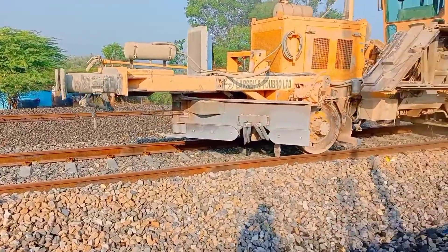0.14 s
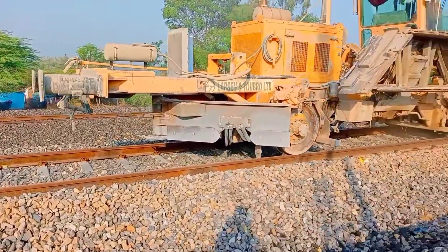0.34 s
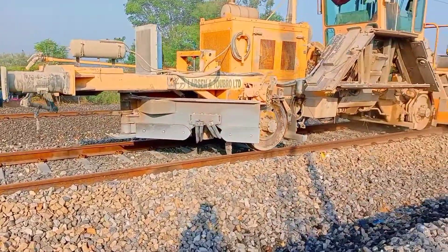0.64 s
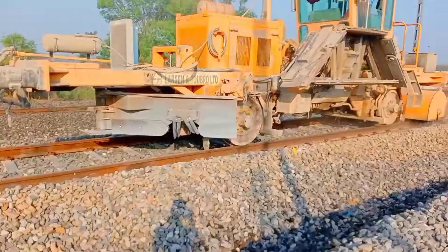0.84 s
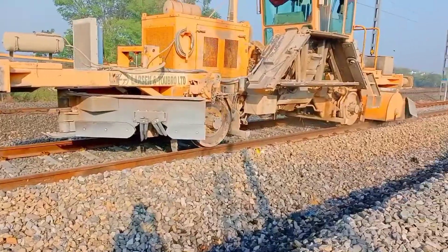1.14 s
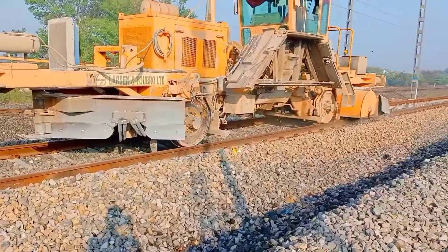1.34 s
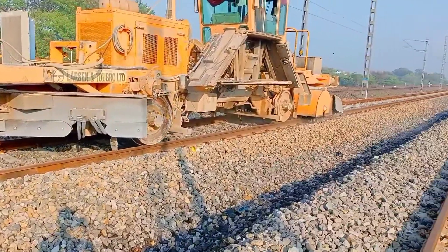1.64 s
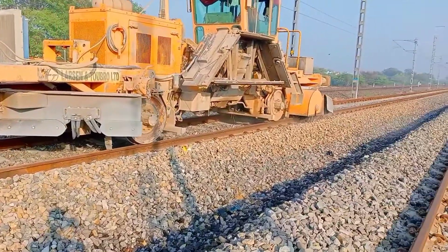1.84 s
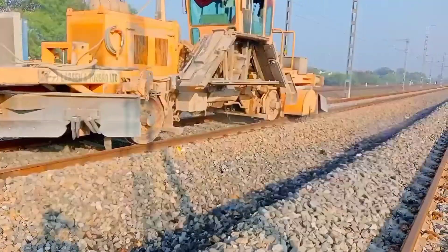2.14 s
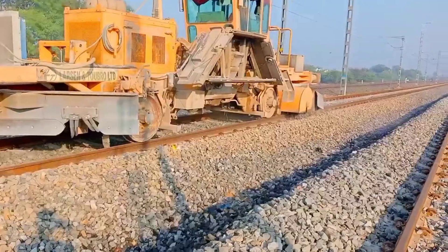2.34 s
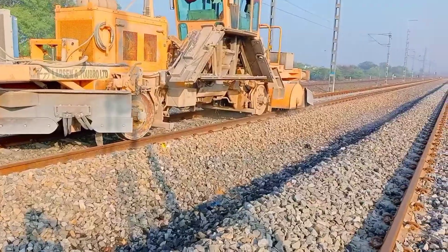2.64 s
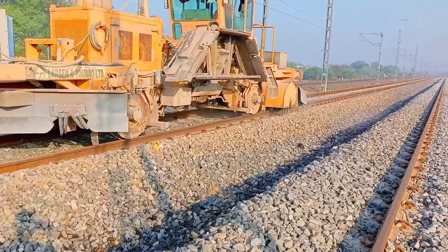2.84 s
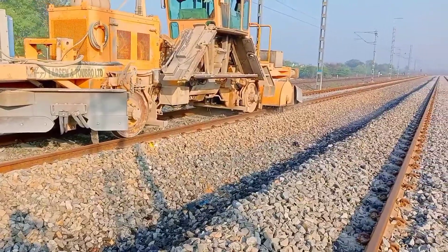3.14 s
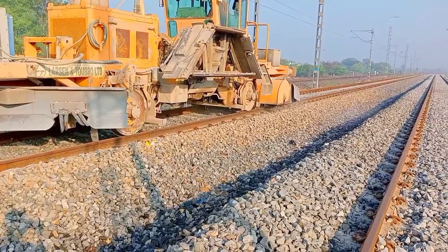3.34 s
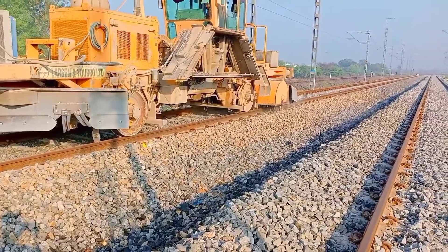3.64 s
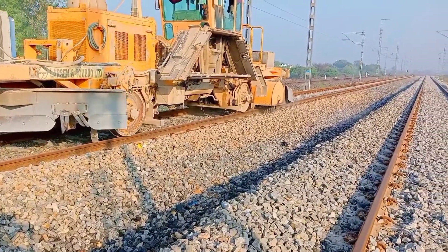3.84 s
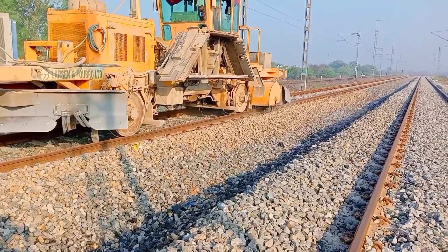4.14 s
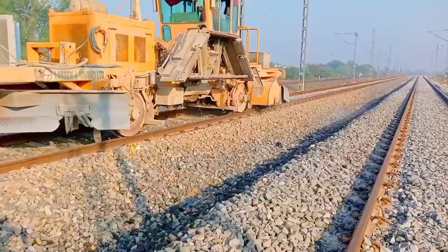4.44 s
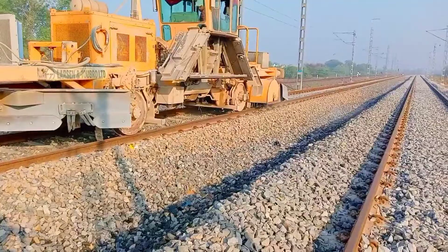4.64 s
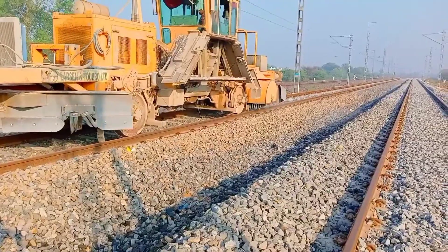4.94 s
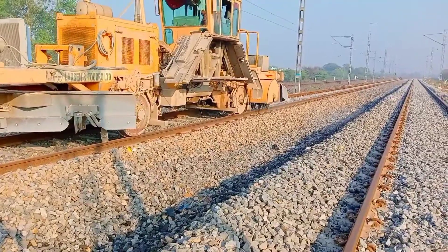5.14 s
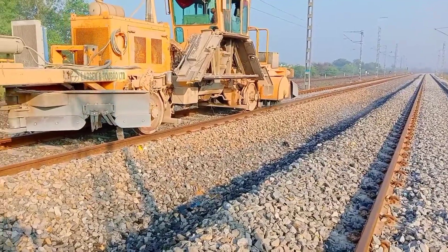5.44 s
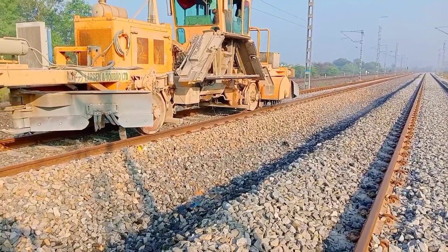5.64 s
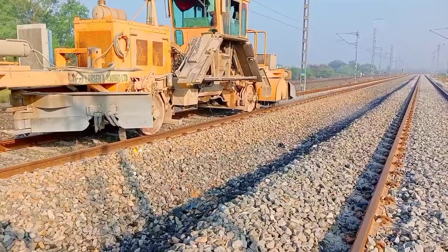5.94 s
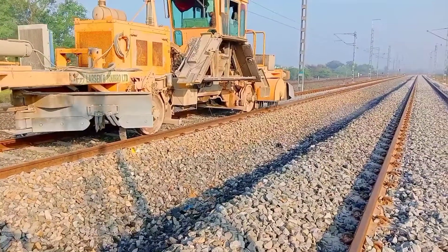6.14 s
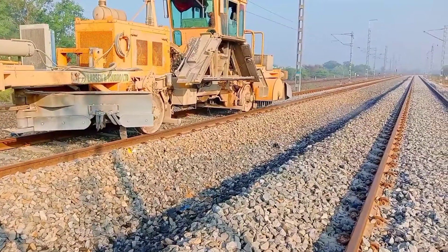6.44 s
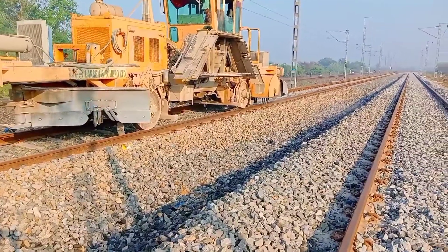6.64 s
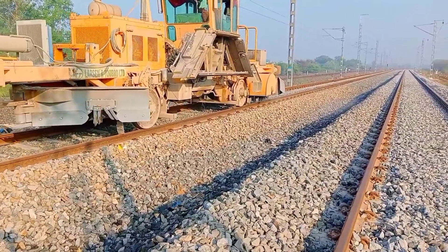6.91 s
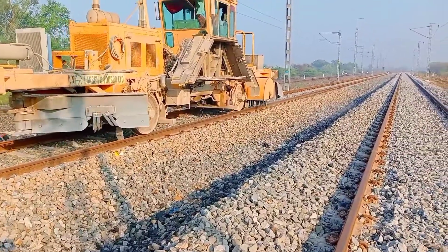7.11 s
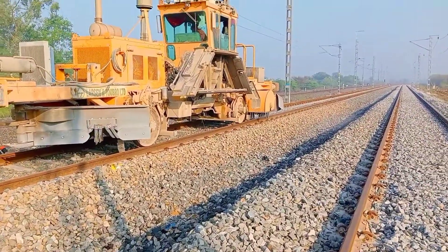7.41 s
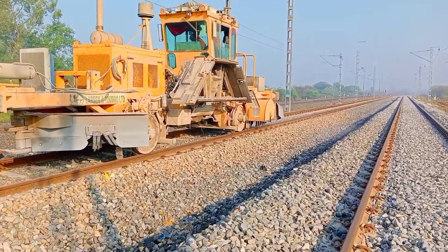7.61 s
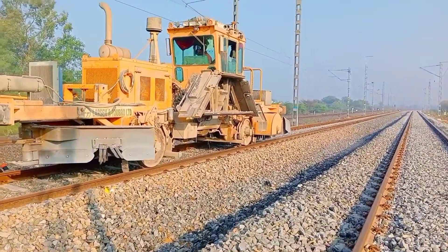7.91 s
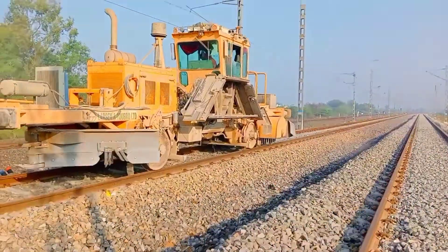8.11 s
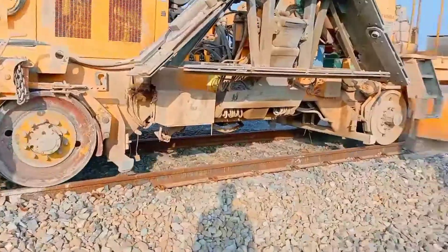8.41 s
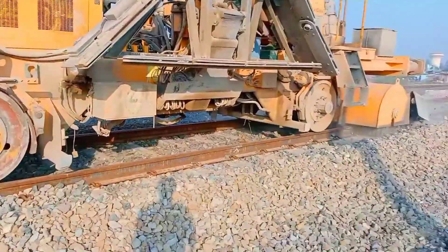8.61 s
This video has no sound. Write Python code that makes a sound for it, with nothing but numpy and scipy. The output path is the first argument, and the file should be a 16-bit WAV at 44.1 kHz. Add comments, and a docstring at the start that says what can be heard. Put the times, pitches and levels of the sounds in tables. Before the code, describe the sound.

Beside an open railway line, a heavy track maintenance machine rolls slowly away. From 0 s its diesel holds a steady, slightly wavering low hum around 200 Hz, under a broad rush of cooling air and a faint thin whine. Loose steel is busiest from 0 to 2.9 s: irregular, closely spaced clanks, several per second, with short bright ringing, dull thuds and tiny gritty rattles. Sharp ticks stand out near 1.2, 1.5, 2.2 and 2.6 s. Clatter then falls away, leaving hum and rush, with one small cluster of clinks and a tick around 3.8 to 4.2 s. The rush gradually softens and darkens. Around 5.7 s the engine pitch dips slightly, recovering by 6.2 s, then runs evenly. At 8.2 s the sound cuts abruptly, leaving a barely audible brief tail. Phone microphone, close outdoor perspective, slight short reflection from the ballast.

```python
"""Beside a railway line, a track maintenance machine rolls slowly away, its six-cylinder diesel at working speed.
Sines locked to the engine cycle make exhaust, fan and pump; a thin whine keeps its own pitch. Shaped noise makes
the rush of cooling air. Loose steel clanks, ticks and rattles, most while the machine is near, as short pushes
ringing steel modes and as tiny grains. All but the tones arrive twice, direct and off the ballast.
The sound stops abruptly, leaving a faint tail."""
import sys
import numpy as np
from scipy import signal
from scipy.fft import rfft, irfft, next_fast_len
from scipy.io import wavfile
from scipy.ndimage import uniform_filter1d

SR = 44100
rng = np.random.default_rng(int(sys.argv[2]) if len(sys.argv) > 2 else 0)


def transcribe(u):
    """Save the signal u as a 16-bit wav file named by the first command-line argument.

    u: samples, shape (n,) or (channels, n), limited to [-1, 1]; the rate is SR.
    q: integer samples, one column per channel.
    """
    v = np.clip(np.atleast_2d(u).T, -1, 1)
    q = np.round(v * 32767).astype(np.int16)
    wavfile.write(sys.argv[1], SR, q)


N = 386737
T = np.arange(N) / SR
MIDWAY_S = 4  # the slow drifts of pump, exhaust and rush peaks pass through zero here

# Governed engine speed with one brief sag under load. Each row: time in seconds, second firing harmonic in Hz,
# level of the hum in dB before HUM_TRIM_DB.
ENGINE_SPEED = [(0, 201.6, -21.5), (1, 202.3, -22), (2.5, 201, -25), (2.9, 201.8, -24), (4.3, 201.8, -24.5),
                (4.8, 201.1, -22.5), (5.5, 201.3, -25), (5.72, 198.3, -24.5), (5.9, 198.4, -23.5),
                (6.15, 202.6, -22.5), (7, 201.6, -24.5), (8.2, 201.5, -22)]
# Exhaust tones. Each row: multiple of the four-stroke cycle, level in dB on top of the hum level.
EXHAUST_ORDERS = [(4, -47.5), (5, -38), (6, -14), (7, -28), (8, -37.5), (9, -33), (10, -20), (11, -23),
                  (12, 0.5), (13, -8.5), (14, -17.5), (15, -19.5), (16, -13.5), (18, -14.5), (20, -33.5),
                  (24, -19.5), (25, -25.5), (28, -29), (29, -34.5), (32, -43.5), (34, -24), (36, -22.5),
                  (39, -21), (42, -19.5), (46, -34.5), (48, -18), (52, -20.5), (54, -28)]
HUM_TRIM_DB, UPPER_FIRING_RISE_DB_PER_S = -1.77, 1.2  # the exhaust turns towards the phone
# Cooling fan: blade tone against the untrimmed hum at the start, sinking as the machine draws away.
FAN_ORDER, FAN_OCTAVE_DB, FAN_DB, FAN_FALL_DB_PER_S = 13.21, -16, -4, 0.7
# Belt pump. Each row: multiple of the cycle, level in dB midway, wavering in dB.
PUMP_WHINES = [(22.16, -43.5, 3)]
PUMP_FALL_DB_PER_S = 0.85  # the pump turns away
# Thin whine that keeps its pitch. Each row: time in seconds, level in dB.
STEADY_WHINE = [(0, -38), (1.7, -47), (2.6, -37), (3.4, -35.5), (4.2, -42.5), (5.6, -45.5), (6.3, -39.5),
                (7.2, -39.5), (8.2, -44.5)]
STEADY_HZ = 1682

# Colour of the rush, relative within each of its four ranges. Each row: frequency in Hz, density in dB per Hz.
RUSH_COLOUR = [(18, -73.5), (30, -52.5), (86, -23.5), (145, -20), (210, -12), (330, -10), (520, -20),
               (620, -12.5), (900, -12), (1010, -26.5), (1190, -18.5), (2230, -24.5), (3770, -23),
               (4600, -26.5), (5300, -30.5), (7600, -43), (9400, -43.5), (10600, -65.5), (12500, -54.5),
               (16000, -49)]
# Rush in four ranges: low, middle, treble and top. Each row: level far off in dB, extra level while near in dB,
# fading time in seconds. The middle is trimmed once more in rush().
RUSH_LEVELS = [(-29, 5, 1.8), (-27.5, 5, 4.45), (-46, 3, 4.5), (-56.5, 12, 1.3)]
# Narrow bands of noise laid over the rush, sinking slowly in pitch as the machine draws away. Each row:
# centre midway in Hz, width in Hz, level in dB added to the middle row of RUSH_LEVELS.
RUSH_PEAKS = [(2503, 27, -17), (3099, 71, -10), (3650, 220, -13)]
PEAK_SAG_PER_S = 0.006  # share of the midway pitch lost each second

RATTLE_COUNT, RATTLE_FADE_S = 400, 1.5
RATTLE_DB, RATTLE_SPREAD_DB = -34.5, 2.5  # grain setting, and mean random lift above it

# Blows on loose steel, levels before the trims in clanks(). Each row: start in seconds, plates in dB,
# thud in dB, lower ring in Hz, lower ring in dB, upper ring in dB, small parts in dB.
CLANKS = [(0.009, -41, -24.5, 2666, -55, -40, -35), (0.096, -26, -36, 2655, -33, -43, -35),
          (0.176, -22, -42, 2580, -30, -39, -29), (0.236, -42, -35, 2720, -36, -31, -49),
          (0.39, -40, -32, 2550, -45, -54, -38), (0.44, -29, -43, 2610, -36, -32, -38),
          (0.503, -36, -42, 2750, -55, -38, -55), (0.572, -23, -23.5, 2730, -26, -35, -35),
          (0.605, -21.5, -16, 2260, -29, -40, -35), (0.657, -28, -28, 2530, -39, -27, -39),
          (0.778, -24, -29, 2580, -49, -39, -34), (0.801, -29, -35, 2386, -38, -45, -53),
          (0.867, -23, -27, 2310, -36, -32, -33), (0.895, -25, -33, 2530, -48, -35, -36),
          (0.977, -21.5, -30, 2650, -30, -41, -37.5), (1.023, -30, -33, 2503, -43, -52, -44),
          (1.108, -20.5, -38, 2590, -23, -22, -41), (1.163, -18, -39, 2675, -20, -30, -36),
          (1.227, -38, -43, 2530, -40, -24, -48), (1.264, -24.5, -37, 2680, -32, -26, -36),
          (1.346, -26, -36, 2600, -23.5, -32, -41), (1.43, -26, -30, 2105, -33, -48, -55),
          (1.526, -19.5, -28, 2620, -20, -28, -38), (1.546, -33, -48, 2600, -27, -36, -58),
          (1.748, -27.5, -52, 2590, -41, -35, -44), (1.807, -31, -43, 2054, -31, -47, -43),
          (1.905, -24.5, -31, 2650, -43, -37, -57), (2.079, -25.5, -38, 2600, -36, -44, -46),
          (2.184, -17.5, -16, 2790, -33, -26, -49), (2.287, -38, -31, 2480, -28, -36, -58),
          (2.347, -35, -47, 2460, -55, -46, -57), (2.459, -37, -30, 2025, -55, -39, -48),
          (2.597, -14.5, -42, 2480, -32, -27.5, -29), (2.69, -25.5, -50, 2590, -42, -47, -43),
          (2.774, -22.5, -27, 2580, -41, -49, -38), (2.82, -26, -27, 2490, -39, -28, -41),
          (2.867, -38, -32, 2500, -40, -49, -54), (3.83, -36, -40, 2510, -51, -55, -41.5),
          (3.968, -26.5, -36, 2620, -43, -34, -32.5), (4.122, -27, -47, 2570, -49, -34, -46)]
# Damped modes of the plates. Each row: frequency in Hz, 60 dB decay in seconds, level in dB before the mix.
PLATE_MODES = [(1352, 0.04, -8.5), (1567, 0.011, 4), (2147, 0.013, 2.5), (2800, 0.0043, 4.5),
               (3250, 0.0071, 1.5), (3810, 0.0085, 4), (4234, .015, -0.5), (5430, .008, -27)]
# Damped modes of the small parts. Each row: frequency in Hz, 60 dB decay in seconds, level in dB before the mix.
SMALL_PART_MODES = [(7570, 0.0081, -6.5), (8400, .01, -1), (8900, 0.015, -5)]
CLANK_RISE_S, CLANK_LENGTH_S = 0.0039, 0.012
THUD, THIN_RING = (635, 0.11), (8620, 0.08)  # Hz, 60 dB decay in s
LOW_RING_T60_S, HIGH_RING_HZ, HIGH_RING_T60_S = 0.071, 3206, 0.15
EDGE_DB, PLATE_CRACK_DB = -22, -17  # against the plates' push
THIN_RING_DB, CRACK_DB, CRACK_FALL_DB_PER_S = -5, -6, 3  # against the small parts' push

# Hard first contacts. Each row: start in seconds, level in dB that the ring decays from.
TICKS = [(1.1718, -11.5), (1.53, -2.5), (2.1886, -3), (2.6108, -12), (3.9705, -8)]
TICK_HZ, TICK_DECAY_S = 3400, 0.00094

# Ballast echo. Each row: time in seconds, delay in milliseconds, strength as a gain.
BALLAST_ECHO = [(0, 1.495, 0.26), (3, 1.521, 0.2), (8.2, 1.505, 0.27)]
MIC_HZ, MIC_WIDTH_HZ, MIC_GAIN = 8880, 560, 1.38  # port resonance of the phone, added to the plain sound
STOP_S, STOP_FADE_S, STOP_TAIL_DB, STOP_T60_S = 8.2, 0.0036, -50, 0.17
TOP_HZ = 15480


def undb(db):
    """Decibels to gain."""
    return 10 ** (np.asarray(db) / 20)


def level(x, db):
    """Scale to an rms level."""
    return x * undb(db) / np.sqrt(np.mean(x ** 2))


def curves(table):
    """Columns of a table joined by straight lines in time."""
    s, *columns = np.transpose(table)
    return [np.interp(T, s, c) for c in columns]


def walk(rate):
    """Random levels held 1 / rate seconds and slewed twice; spread near 1."""
    k = int(SR / rate)
    steps = np.repeat(rng.standard_normal(N // k + 1), k)
    return 1.59 * uniform_filter1d(uniform_filter1d(steps, k), k)[:N]


def band(x, lo_hz, hi_hz):
    """Gentle band-pass."""
    return signal.sosfilt(signal.butter(2, [lo_hz, hi_hz], "band", fs=SR, output="sos"), x)


def engine():
    """Exhaust orders of the cycle waver a little; fan and pump turn with the crank; one whine stands apart."""
    hz, hum_db = curves(ENGINE_SPEED)
    cycle = 2 * np.pi * np.cumsum(hz / 12) / SR  # the second firing harmonic is the 12th order
    start = rng.uniform(0, 2 * np.pi, len(EXHAUST_ORDERS))
    out = 0
    for (k, db), phase in zip(EXHAUST_ORDERS, start):
        # higher orders are smeared more by uneven firing
        rise_db = UPPER_FIRING_RISE_DB_PER_S * (T - MIDWAY_S) * (k in (18, 24))
        order_db = hum_db + db + rise_db + HUM_TRIM_DB + 0.06 * k * walk(8)
        out = out + undb(order_db) * np.sin(k * cycle + phase + 0.014 * k * walk(12))

    blades = FAN_ORDER * cycle + 0.16 * walk(6.6)
    fan_db = hum_db + FAN_DB - FAN_FALL_DB_PER_S * T + 0.8 * walk(6.5)
    out = out + undb(fan_db) * (np.sin(blades) + undb(FAN_OCTAVE_DB) * np.sin(2 * blades))

    for k, db, waver_db in PUMP_WHINES:
        pump_db = db - PUMP_FALL_DB_PER_S * (T - MIDWAY_S) + waver_db * walk(8.2)
        out = out + undb(pump_db) * np.sin(k * cycle + 0.63 * walk(25))

    steady_db = curves(STEADY_WHINE)[0] + 2.0 * walk(5.8)
    out = out + undb(steady_db) * np.sin(2 * np.pi * STEADY_HZ * T + 1.0 * walk(25))
    return np.sqrt(2) * out  # levels are rms


def rush():
    """Turbulent noise in third-octave bands that swell together and flicker alone."""
    size = next_fast_len(N)
    f = np.fft.rfftfreq(size, 1 / SR) + 1
    hz, db = np.transpose(RUSH_COLOUR)
    air = rfft(rng.standard_normal(N), size) * undb(np.interp(np.log(f), np.log(hz), db))
    ranges, swell = [0, 0, 0, 0], walk(10)
    for step in np.arange(-15, 13):  # third octaves from 1 kHz
        share = np.clip(1 - np.abs(3 * np.log2(f / 1000) - step), 0, 1)
        flickering = irfft(air * share, size)[:N] * undb(0.4 * swell + 1.3 * walk(22))
        ranges[int(step >= 0) + int(step >= 7) + int(step >= 10)] += flickering
    low, middle, treble, top = ranges

    low_db, middle_db, treble_db, top_db = (
        far_db + near_db * np.exp(-T / fading_s) for far_db, near_db, fading_s in RUSH_LEVELS)
    peaks = sum(level(rush_peak(hz, width), db) * undb(1.3 * walk(6.5)) for hz, width, db in RUSH_PEAKS)
    out = level(low, 0) * undb(low_db)
    out += (level(middle, -2.5) + peaks) * undb(middle_db)
    out += level(treble, 0) * undb(treble_db)
    return out + level(top, 0) * undb(top_db)


def rush_peak(hz, width_hz):
    """A narrow band of noise around a slowly sinking centre."""
    r = np.exp(-np.pi * width_hz / SR)
    noise = rng.standard_normal(N) + 1j * rng.standard_normal(N)
    slow = signal.lfilter([1], [1, -r], noise)
    centre = hz * (1 - PEAK_SAG_PER_S * (T - MIDWAY_S))
    return (slow * np.exp(2j * np.pi * np.cumsum(centre) / SR)).real


def rattles():
    """Stones and small parts crackle in short grains, thinning out as the machine draws away."""
    out, t = np.zeros(N + SR), np.arange(SR // 40) / SR
    shape = t / 0.0012 * np.exp(1 - t / 0.001)
    for when, pitch, size, high in rng.uniform(1e-6, 1, (RATTLE_COUNT, 4)):
        i = int(min(-RATTLE_FADE_S * np.log(when) * SR, N))
        # half the grains are high and faint
        hz, db = (7400 + 2100 * pitch, -15) if high < 0.5 else (1400 + 3400 * pitch, 0)
        grain_db = RATTLE_DB + db - RATTLE_SPREAD_DB * np.log(size)
        out[i:i + len(t)] += undb(grain_db) * shape * np.sin(2 * np.pi * hz * t)
    return out[:N]


def clanks():
    """Each blow is a short chatter of contacts: a quick rise, a fade, and the steel ringing."""
    push, low_pitch = np.zeros((5, N + SR)), np.ones(N)
    t = np.arange(1, SR // 8) / SR
    shape = (1 - np.exp(-t / CLANK_RISE_S)) * np.exp(-(t / CLANK_LENGTH_S) ** 1.22 / 2)
    for s, plates_db, thud_db, low_hz, *rest_db in CLANKS:
        i = int(s * SR)
        push[:, i:i + len(t)] += undb([plates_db, thud_db, *rest_db])[:, None] * shape
        low_pitch[i:] = low_hz  # held until the next blow
    plates, thud, low, high, parts = push[:, :N]

    chatter = rng.standard_normal(N) * undb(1.4 * walk(250))
    heavy = sum(undb(db) * ring(band(chatter, 1200, 4400), hz, t60) for hz, t60, db in PLATE_MODES)
    small = sum(undb(db) * ring(band(chatter, 7000, 9200), hz, t60) for hz, t60, db in SMALL_PART_MODES)
    out = level(heavy, 7.25) * fade(plates, 0.095) + level(small, -1.1) * fade(parts, 0.11)
    out += level(band(chatter, 5000, 7000), EDGE_DB) * fade(plates, 0.037)

    crack_push = undb(CRACK_DB) * parts + undb(PLATE_CRACK_DB) * plates
    crack = level(band(chatter, 9800, 17000), 0) * fade(crack_push, 0.091)
    out += crack * undb(-CRACK_FALL_DB_PER_S * T)

    out += undb(1.8) * mode(thud, *THUD) + undb(THIN_RING_DB) * mode(parts, *THIN_RING)
    clear_rings = mode(low, low_pitch, LOW_RING_T60_S) + mode(high, HIGH_RING_HZ, HIGH_RING_T60_S)
    return out + undb(7.5) * clear_rings


def ring(x, hz, t60):
    """One decaying mode, with the same power for noise whatever its decay."""
    r = np.exp(-np.log(1000) / (t60 * SR))
    poles = [1, -2 * r * np.cos(2 * np.pi * hz / SR), r * r]
    return signal.lfilter([1, 0, -1], poles, x) * np.sqrt((1 - r * r) / 2)


def fade(push, t60):
    """Size of a vibration that follows the push and dies away with its own decay."""
    r = np.exp(-np.log(1000) / (t60 * SR))
    return np.sqrt(signal.lfilter([1 - r * r], [1, -r * r], push ** 2))


def mode(push, hz, t60):
    """A clear ring, shaken in size and phase by new contacts."""
    size = np.sqrt(2) * fade(push, t60) * undb(1.9 * walk(140))
    phase = 2 * np.pi * np.cumsum(hz * np.ones(N)) / SR + 1.65 * walk(90)
    return size * np.sin(phase)


def ticks():
    """Hard contacts: one short decaying ring each."""
    out, t = np.zeros(N), np.arange(SR // 50) / SR
    tick = np.exp(-t / TICK_DECAY_S) * np.sin(2 * np.pi * TICK_HZ * t)
    for s, db in TICKS:
        out[int(s * SR):][:len(t)] += undb(db) * tick
    return out


def scene():
    """Rush and loose steel come direct and again off the ballast, which combs their colour; tones come once."""
    direct = rush() + rattles() + clanks() + ticks()
    delay_ms, strength = curves(BALLAST_ECHO)
    echo = np.interp(T - delay_ms / 1000, T, direct)
    # rough stones scatter the treble
    echo = signal.sosfilt(signal.butter(2, 4000, fs=SR, output="sos"), echo)
    both = (direct + strength * echo) / np.sqrt(1 + strength ** 2)
    return (engine() + both)[None]


def record(dry):
    """The microphone port lifts a treble band; the sound stops, leaving a faint quick tail; the top is cut."""
    port = signal.lfilter(*signal.iirpeak(MIC_HZ, MIC_HZ / MIC_WIDTH_HZ, fs=SR), dry)
    dry = dry + MIC_GAIN * port
    after = np.maximum(T - STOP_S, 0)
    dull = signal.lfilter([0.05], [1, -0.95], dry)
    tail = dull * undb(STOP_TAIL_DB - 60 * after / STOP_T60_S)
    cut = np.clip(1 - after / STOP_FADE_S, 0, 1)
    top_cut = signal.ellip(14, 0.2, 80, TOP_HZ, fs=SR, output="sos")
    return signal.sosfilt(top_cut, dry * cut + tail * (1 - cut))


dry = scene()
out = record(dry)
transcribe(out)
```